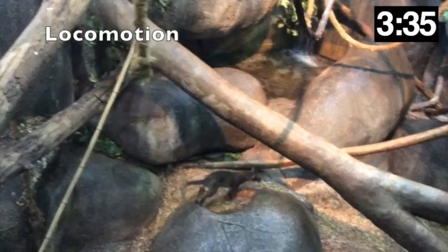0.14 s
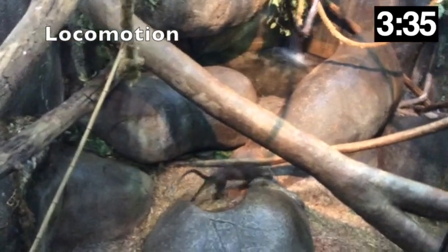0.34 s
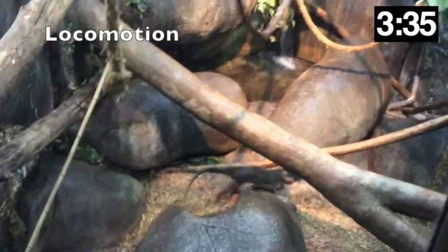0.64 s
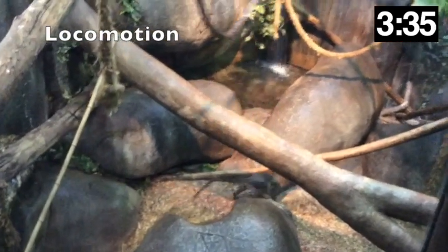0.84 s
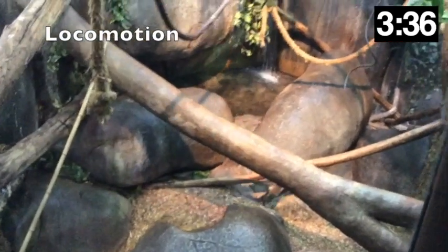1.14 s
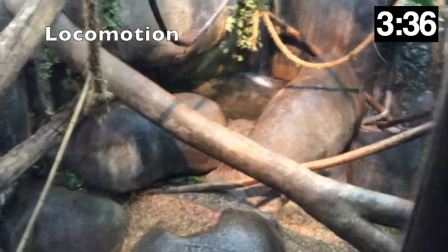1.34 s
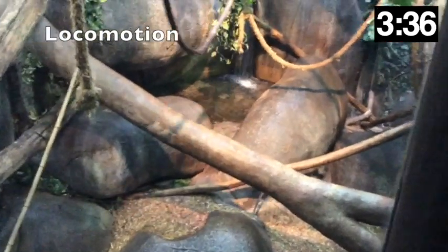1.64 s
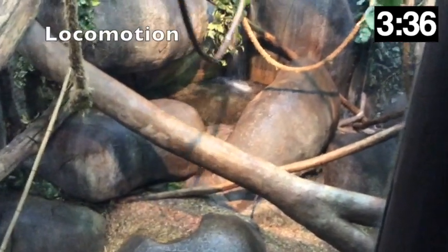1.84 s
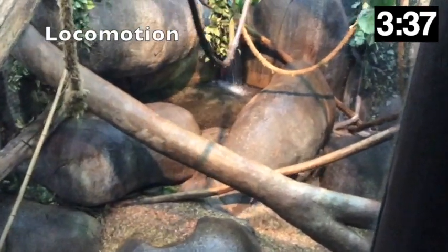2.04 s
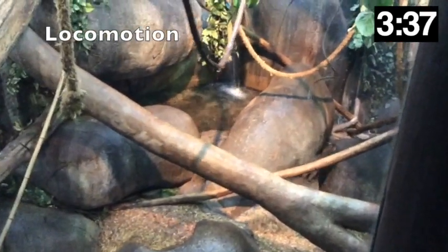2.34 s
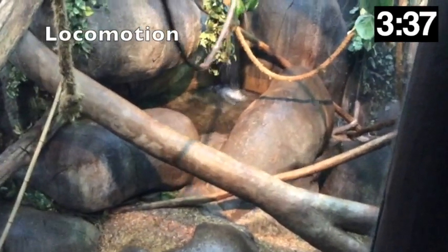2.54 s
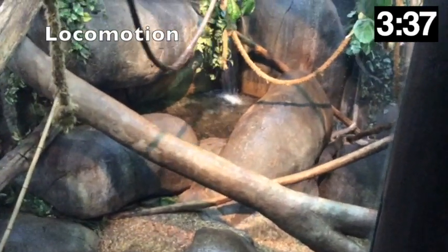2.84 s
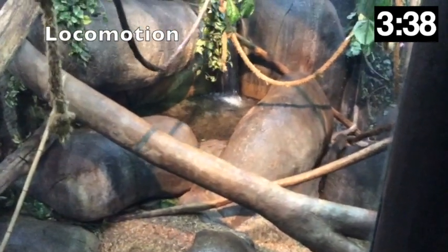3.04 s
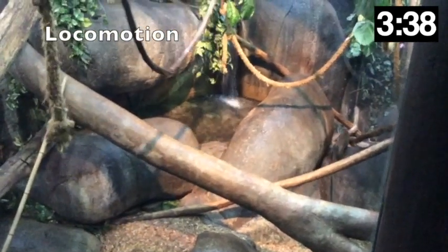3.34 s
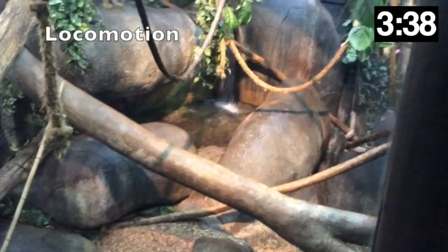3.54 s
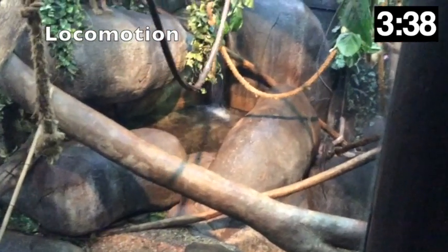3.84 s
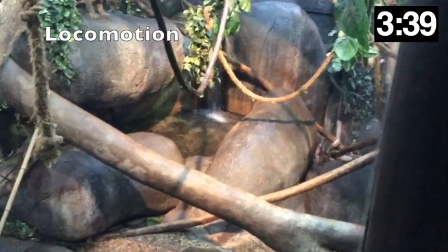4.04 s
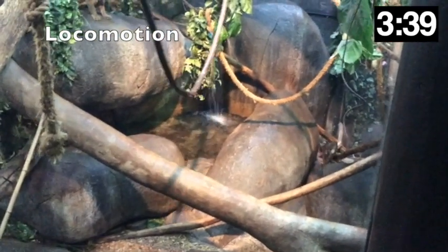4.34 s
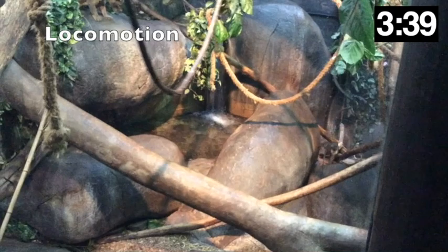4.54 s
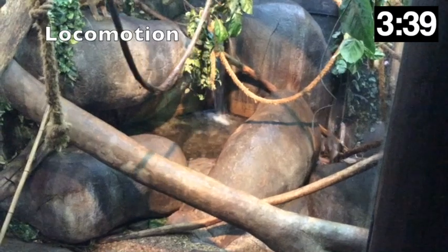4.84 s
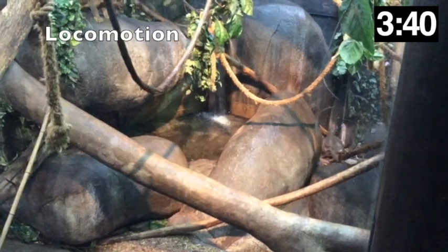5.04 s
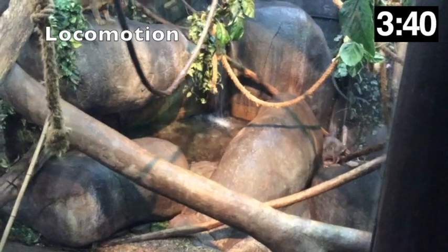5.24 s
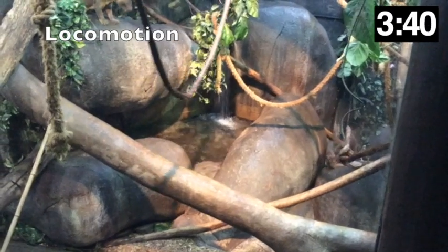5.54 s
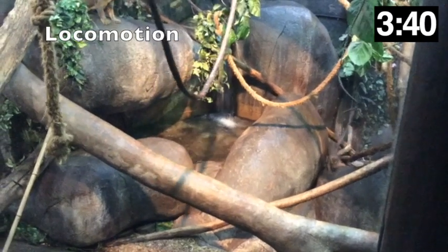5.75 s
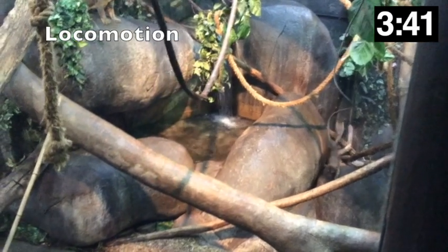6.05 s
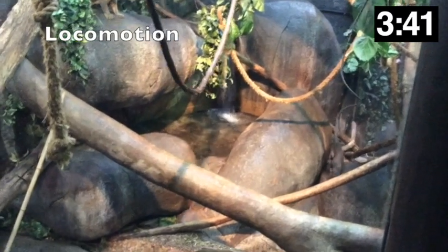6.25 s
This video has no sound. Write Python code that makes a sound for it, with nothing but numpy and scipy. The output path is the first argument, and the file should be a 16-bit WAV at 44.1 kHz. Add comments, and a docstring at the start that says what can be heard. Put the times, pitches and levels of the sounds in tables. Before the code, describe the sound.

A small monkey gives four long, high rising whistles and then faint chirps, over a soft waterfall hiss, insects and ventilation hum.

```python
"""Four long rising whistles come first, from a small monkey in a rocky indoor enclosure; then a squeak
and a run of faint chirps. Its voice is an almost pure tone that sags and dies when the effort stops.
Hard walls return each whistle a little late, so it beats against itself and leaves a tail.
Behind it are a small hissing waterfall, ventilation, a high drone of insects, crickets trilling with
their wings, and a few soft shuffles and dull knocks."""
import sys
import numpy as np
from scipy import signal
from scipy.fft import rfft, irfft, next_fast_len
from scipy.io import wavfile
from scipy.ndimage import uniform_filter1d

SR = 44100
rng = np.random.default_rng(int(sys.argv[2]) if len(sys.argv) > 2 else 0)


def wav_record(signal):
    """Record a signal, one row per channel, as 16-bit PCM in the file named by sys.argv[1]."""
    frames = np.transpose(np.atleast_2d(signal))
    bounded = np.clip(frames, -1, 1)
    # unit amplitude maps onto the largest positive 16-bit level
    quanta = np.round(bounded * 32767).astype(np.int16)
    wavfile.write(sys.argv[1], SR, quanta)


N = 281313
TIME = np.arange(N) / SR

# the rush of ventilation air (frequency [Hz], relative level [dB])
AIR_SPECTRUM = [(20, -32), (40, -6.5), (60, 1), (100, -1), (210, -1.5), (310, -8), (600, -11.5),
                (1000, -13), (1400, -14), (1650, -12.5), (1850, -14.5), (2400, -15.5), (2900, -18),
                (6000, -46)]
# ducts that the air sets ringing (centre [Hz], width [Hz], level [dB])
DUCT_BANDS = [(772, 22, -73), (880, 35, -72), (1038, 35, -67.5), (1240, 18, -75), (1650, 40, -73)]
# steady machine tones (pitch [Hz], level [dB])
MACHINE_TONES = [(98, -65), (207.6, -66.5), (2018, -68.5), (5636, -66)]
# how loud the fan's tone is (time [s], level [dB])
FAN_LOUDNESS = [(0, -68.5), (1.7, -66), (2.3, -73), (3.0, -63.5), (4.5, -65.5), (4.9, -72.5), (6.38, -72.5)]
# the body of the waterfall (frequency [Hz], relative level [dB])
WATER_SPECTRUM = [(500, -13), (2500, -5), (3300, -4), (5000, 0), (7000, -1), (7800, -4), (9400, -4),
                  (11000, -9.5), (12800, -13), (13400, -18), (15300, -20)]
# its bright spray (frequency [Hz], relative level [dB])
SPRAY_SPECTRUM = [(3000, -20), (7000, -2), (10000, -2), (12700, 1), (13400, -8), (15300, -12)]
# the spray fades as a pillar comes between (time [s], level [dB])
SPRAY_LOUDNESS = [(0, -62), (1.5, -59.5), (3.1, -61), (3.7, -76), (6.38, -78)]
# bands of the insect chorus (centre [Hz], width [Hz], level [dB])
INSECT_BANDS = [(3696, 94, -65), (3856, 43, -65.5), (4050, 204, -55), (4333, 80, -59), (4610, 26, -64.5),
                (4910, 170, -60.5), (5113, 53, -60.5), (5590, 300, -58.5), (5930, 130, -60.5),
                (6304, 220, -52), (6600, 110, -58.5), (8860, 100, -107.5), (10560, 200, -100)]
# its lowest band (centre [Hz], width [Hz])
LOW_INSECT_BAND = (2166, 160)
# how loud that band is (time [s], level [dB])
LOW_INSECT_LOUDNESS = [(0, -60), (.9, -60.5), (1.6, -56), (3.2, -57.5), (4.2, -59.5), (5.2, -56),
                       (6.38, -62)]
# crickets (pitch [Hz], wing strokes [1/s], first trill [s], trill length [s], repeat [s], level [dB])
CRICKET_SONGS = [(4100, 18.9, 1.2, 5.3, 6, -58.5), (4320, 22, .4, .7, 2.1, -60),
                 (4870, 18, 1.35, .23, 6, -52.5), (3715, 20, 3.42, .36, 2.1, -59),
                 (4980, 16, 5.08, .65, 3, -59.5)]
# soft shuffles (middle time [s], length [s], centre [Hz], width [Hz], level [dB])
SOFT_SHUFFLES = [(1.5, 0.68, 230, 470, -51), (1.52, 0.73, 1100, 2300, -55.5), (3.73, .3, 830, 400, -58),
                 (4.3, .75, 470, 230, -58), (4.15, 0.47, 182, 37, -56)]
# dull knocks (time [s], pitch [Hz], ring time [s], level [dB])
DULL_KNOCKS = [(.51, 690, .12, -47), (1.468, 248, .15, -37), (1.83, 770, .12, -47), (3.7, 775, .14, -47),
               (3.745, 790, .14, -47)]
# clear echoes from the far walls (delay [s], level [dB])
WALL_ECHOES = [(.049, -15), (.068, -12.5), (.094, -16)]
# the squeak before the chirps (time [s], length [s], start pitch [Hz], end pitch [Hz], level [dB])
OPENING_SQUEAK = (5.096, .055, 7600, 8600, -45.5)
# chirps that end in a thin peep (time [s], length [s], level [dB], peep pitch [Hz], peep level [dB])
CHIRP_RUN = [(5.298, .042, -50, 7900, -55), (5.502, .04, -54, 7350, -50), (5.686, .045, -52, 7200, -48.5),
             (5.874, .042, -54, 7050, -49), (6.048, .055, -54, 6100, -51)]
# the path of each whistle, as a list of points (time [s], pitch [Hz], level [dB])
WHISTLE_CURVES = [
    [(.09, 6170, -47.5), (.19, 6150, -42.5), (.26, 6210, -45), (.40, 6350, -36), (.49, 6417, -31.5),
     (.612, 6580, -34), (.628, 6574, -22), (.645, 6580, -40.5), (.72, 6654, -31), (.775, 6670, -28),
     (.86, 6706, -37), (.94, 6753, -22), (1.0, 6810, -39), (1.045, 6874, -23.5), (1.105, 6875, -30.5),
     (1.14, 6940, -29), (1.175, 6960, -28)],
    [(1.585, 6208, -46.5), (1.66, 6220, -32.5), (1.683, 6320, -56), (1.692, 6277, -27.5),
     (1.78, 6490, -46.5), (1.81, 6480, -24.5), (1.85, 6610, -34.5), (1.925, 6613, -29.5),
     (1.95, 6680, -30.5), (1.995, 6744, -27), (2.04, 6820, -38), (2.088, 6840, -23), (2.12, 6860, -36),
     (2.15, 6890, -24.5), (2.2, 6965, -38), (2.222, 6976, -18), (2.243, 7080, -50), (2.26, 7040, -24),
     (2.292, 7048, -25.5), (2.325, 7054, -31)],
    [(2.72, 6140, -46), (2.802, 6290, -43), (2.812, 6355, -30.5), (2.835, 6360, -34), (2.85, 6420, -37),
     (2.922, 6450, -42), (2.945, 6500, -24), (2.975, 6530, -38), (2.988, 6535, -38), (3.04, 6595, -32.5),
     (3.112, 6654, -23), (3.16, 6700, -33.5), (3.22, 6737, -28), (3.3, 6810, -35), (3.335, 7180, -26),
     (3.368, 7320, -30.5), (3.395, 7340, -24.5), (3.43, 7365, -30.5)],
    [(3.99, 6600, -54), (4.025, 6490, -44.5), (4.11, 6476, -38.5), (4.22, 6485, -44), (4.279, 6535, -38),
     (4.286, 6564, -26), (4.315, 6550, -30.5), (4.40, 6623, -40), (4.5, 6730, -31), (4.6, 6760, -40.5),
     (4.614, 6840, -31.5), (4.64, 6730, -44), (4.66, 6880, -30.5), (4.7, 6840, -35.5), (4.728, 6960, -37),
     (4.742, 6850, -34), (4.755, 6880, -36)],
]
# each whistle's octave, a weak tone at twice the pitch (base level relative to the main tone [dB])
WHISTLE_OCTAVES = [-23.5, -22.5, -25, -27]


def undb(db):
    """Turns decibels into a factor to multiply by."""
    return 10 ** (np.asarray(db) / 20)


def unit(x):
    """Scales a sound to an average strength (rms) of 1."""
    return x / np.sqrt(np.mean(x ** 2))


def ramp(start, length):
    """Rises from 0 to 1 over a length of time, then stays."""
    return np.clip((TIME - start) / length, 0, 1)


def arch(start, length):
    """A rounded swell and fade."""
    return np.sin(np.pi * ramp(start, length))


def follow(points):
    """Joins (time, value) points with straight lines."""
    return np.interp(TIME, *np.transpose(points))


def wobble(rate):
    """A smooth random wobble, about 1 in size, that picks a new value `rate` times a second."""
    hold = max(int(SR / rate), 2)
    steps = rng.standard_normal(N)[np.arange(N) // hold]
    return 1.303 * uniform_filter1d(uniform_filter1d(steps, hold), hold)


def noise(gain_at):
    """Noise of strength 1; gain_at says how much of each frequency it holds."""
    size = next_fast_len(N, True)
    hz = np.maximum(np.fft.rfftfreq(size, 1 / SR), 1)
    spectrum = rfft(rng.standard_normal(size)) * gain_at(hz)
    return unit(irfft(spectrum, size)[:N])


def coloured(points):
    """Noise shaped by (frequency [Hz], relative level [dB]) points."""
    hz, db = np.transpose(points)
    return noise(lambda f: undb(np.interp(np.log(f), np.log(hz), db)))


def band(hz, width):
    """Noise kept to a band around one frequency."""
    return noise(lambda f: 1 / np.sqrt(1 + (2 * np.abs(f - hz) / width) ** 4))


def voice(hz, octave_db):
    """An almost pure tone with a weaker one an octave above."""
    phase = 2 * np.pi * np.cumsum(hz) / SR
    return np.sqrt(2) * (np.sin(phase) + undb(octave_db) * np.sin(2 * phase))


def ventilation(air_db=-52.0, fan_hz=415):
    """Rushing air rings the ducts, while machines and a fan hum a little unsteadily."""
    tones = 0
    for hz, db in MACHINE_TONES + [(fan_hz, follow(FAN_LOUDNESS))]:
        pitch = hz + 4 * wobble(15)
        phase = 2 * np.pi * np.cumsum(pitch) / SR
        tones += undb(db + 2 * wobble(6)) * np.sin(phase)
    swell_db = .4 * wobble(4)
    ducts = sum(undb(db) * band(hz, width) for hz, width, db in DUCT_BANDS)
    return np.sqrt(2) * tones + ducts + coloured(AIR_SPECTRUM) * undb(air_db + swell_db)


def waterfall(body_db=-54.3):
    """Water falls into a pool with a smooth hiss; its bright spray fades about halfway through."""
    flicker = undb(.4 * wobble(70))
    body = coloured(WATER_SPECTRUM) * undb(body_db)
    spray = coloured(SPRAY_SPECTRUM) * undb(follow(SPRAY_LOUDNESS))
    return flicker * (body + spray)


def insect_chorus():
    """Far insects blend into shrill bands, each flickering on its own; the lowest comes and goes."""
    out = band(*LOW_INSECT_BAND) * undb(follow(LOW_INSECT_LOUDNESS) + wobble(45))
    for hz, width, db in INSECT_BANDS:
        unsteady_db = .6 * wobble(2.5) + 1.3 * wobble(45)
        out += band(hz, width) * undb(db + unsteady_db)
    return out


def crickets(sweep=.024, scatter=.009, fade_s=.044):
    """Each wing stroke is a short tone that sags in pitch; strokes come in trills with rests between."""
    out = np.zeros(N)
    for hz, rate, first, length, period, db in CRICKET_SONGS:
        stroke = np.cumsum(rate * (1 + .031 * wobble(6))) / SR % 1  # runs from 0 to 1 in each stroke
        pulse = unit(np.sin(np.pi * stroke) ** 6)
        trill_age = (TIME - first) % period
        singing = (TIME > first) * np.clip(np.minimum(trill_age, length - trill_age) / fade_s, 0, 1)
        pitch = hz * (1 + sweep * (1 - 2 * stroke) + scatter * wobble(300))
        out += undb(db + 2 * wobble(8.8)) * singing * pulse * voice(pitch, octave_db=-54)
    return out


def shuffles():
    """Movement makes dull, soft swells of noise."""
    return sum(undb(db) * arch(middle - length / 2, length) ** 2 * band(hz, width)
               for middle, length, hz, width, db in SOFT_SHUFFLES)


def knocks(push_s=.011):
    """Each dull knock is one low tone that eases in and quickly dies away."""
    out = np.zeros(N)
    for start, hz, ring_s, db in DULL_KNOCKS:
        age = np.maximum(TIME - start, 0)
        out += ramp(start, push_s) * undb(db - 60 * age / ring_s) * np.sin(2 * np.pi * hz * age)
    return out


def enclosure(sound, direct_db, early_db, late_db, early_ring_s=.46, ring_s=.6, treble_ring_s=.35):
    """Rocks scatter early echoes, far walls send back clear ones, and the tail loses its treble first."""
    t = np.arange(SR) / SR
    rocks = rng.standard_normal(SR) * (rng.random(SR) < .004) * (t > .012)
    rocks *= undb(-60 * t / early_ring_s)  # a ring time is how long a sound takes to fall 60 dB
    wash = rng.standard_normal(SR) * np.clip(t / .032, 0, 1)
    low = signal.sosfiltfilt(signal.butter(4, 10000, fs=SR, output="sos"), wash)
    tail = low * undb(-60 * t / ring_s) + (wash - low) * undb(-60 * t / treble_ring_s)
    echoes = undb(early_db) * rocks / np.linalg.norm(rocks) + undb(late_db) * tail / np.linalg.norm(tail)
    for delay, db in WALL_ECHOES:
        echoes[int(delay * SR)] += undb(db)
    return undb(direct_db) * sound + signal.fftconvolve(sound, echoes)[:N]


def chirp(start, length, from_hz, to_hz, db, octave_db, rough):
    """The voice sweeps quickly and roughly upward, then levels off."""
    pitch = from_hz + (to_hz - from_hz) * np.sin(np.pi / 2 * ramp(start, length))
    return undb(db) * arch(start, length) * voice(pitch * (1 + rough * wobble(1200)), octave_db)


def monkey_chirps(peep_s=.046, flick_s=.028, flick_hz=1700, rasp_s=.042, rasp_db=-52):
    """A squeak, then chirps, each jumping up to a rough peep that flicks down with a dry rasp."""
    out = chirp(*OPENING_SQUEAK, octave_db=-25, rough=.0112)
    rasp = undb(rasp_db) * band(7300, 5200)
    for start, length, db, peep_hz, peep_db in CHIRP_RUN:
        out += chirp(start, length, from_hz=5250, to_hz=6080, db=db, octave_db=-7, rough=.022)
        peep_start = start + .6 * length
        flick_start = peep_start + peep_s / 2
        pitch = (peep_hz - flick_hz * ramp(flick_start, flick_s)) * (1 + .04 * wobble(1500))
        out += undb(peep_db) * arch(peep_start, peep_s) * voice(pitch, octave_db=-30)
        out += arch(flick_start - rasp_s / 3, rasp_s) * rasp
    high_sizzle = undb(-66) * arch(5.39, .27) * band(13750, 1200)
    return out + high_sizzle


def monkey_whistle(curve, octave_db, onset_s=.009, effort_s=.19, sag_hz=900, sag_s=.05, fade_db_per_s=330):
    """The whistle starts softly and rises, its loudness swelling and dipping as it beats with the
    room's echoes; when the effort stops, it sags hoarsely and dies."""
    times, hz, db = np.transpose(curve)
    glide = np.interp(TIME, times, hz)
    strain = np.clip((glide - 6950) / 350, 0, 1)  # only the highest notes turn rough
    since_end = np.maximum(TIME - times[-1], 0)
    release = 1 - np.exp(-since_end / sag_s)
    hoarse_sag = sag_hz * release * (1 + .5 * wobble(700))
    waver = 1 + .0008 * wobble(45) + .0006 * wobble(400)
    pitch = glide * waver - hoarse_sag - 45 * strain * np.abs(wobble(500))
    loudness_db = np.interp(TIME, times, db)
    tremble_db = wobble(29.9) + .8 * wobble(160)
    level_db = loudness_db + tremble_db - fade_db_per_s * since_end
    # the octave follows the slow effort rather than each swell and dip, and thins on the highest notes
    effort_db = uniform_filter1d(loudness_db, int(effort_s * SR))
    overtone_db = octave_db + effort_db - loudness_db + .4 * (effort_db + 29) - 9 * np.sqrt(strain)
    return voice(pitch, overtone_db) * ramp(times[0] - onset_s, onset_s) * undb(level_db)


def scene():
    """The monkey calls over the background; the crickets are farther off, so more of them is echo."""
    whistles = sum(monkey_whistle(curve, db) for curve, db in zip(WHISTLE_CURVES, WHISTLE_OCTAVES))
    near = enclosure(whistles + monkey_chirps(), direct_db=-1.7, early_db=-11, late_db=-8.3)
    far = enclosure(crickets(), direct_db=-4, early_db=-5, late_db=-4.5)
    return (near + far + insect_chorus() + ventilation() + waterfall() + shuffles() + knocks())[None]


def record(dry):
    """A steep filter takes away the very highest treble, above 15290 Hz."""
    return signal.sosfilt(signal.ellip(12, .1, 80, 15290, fs=SR, output="sos"), dry)


dry = scene()
out = record(dry)
wav_record(out)
```